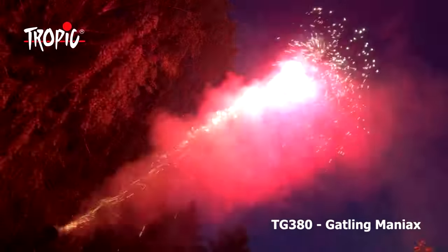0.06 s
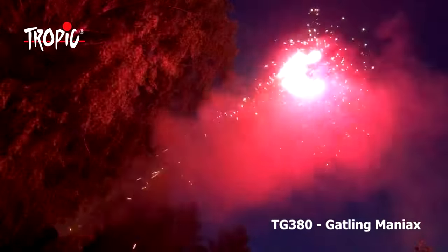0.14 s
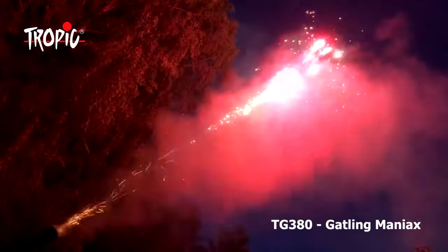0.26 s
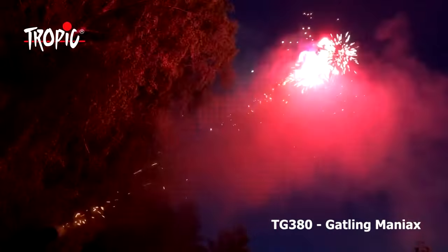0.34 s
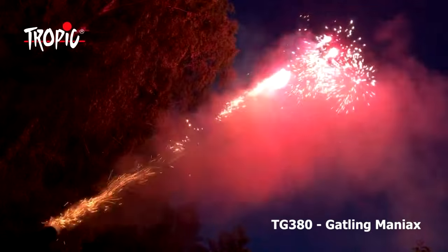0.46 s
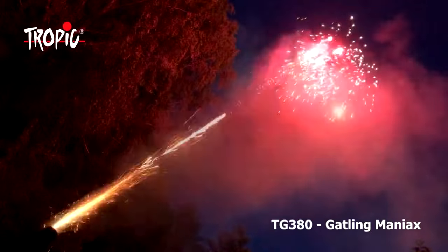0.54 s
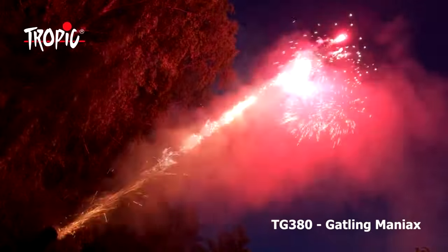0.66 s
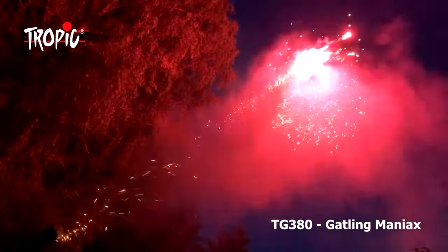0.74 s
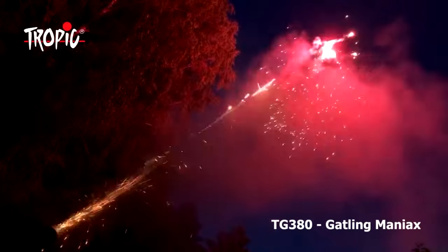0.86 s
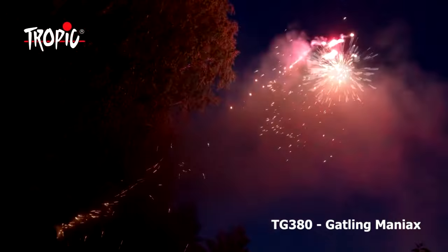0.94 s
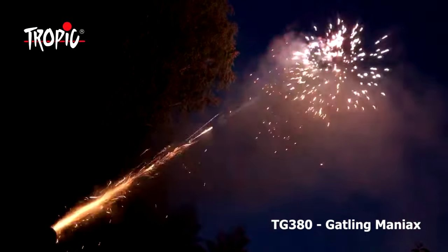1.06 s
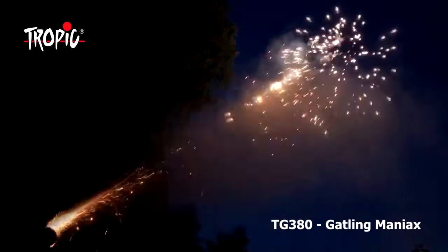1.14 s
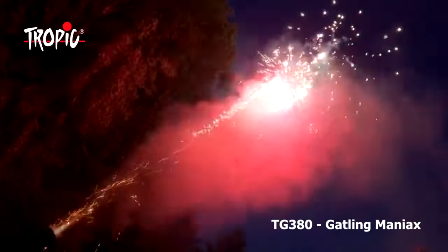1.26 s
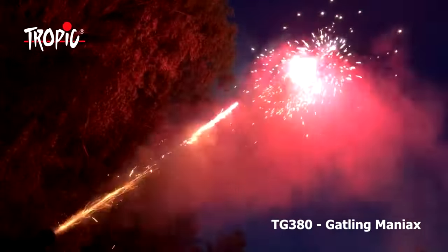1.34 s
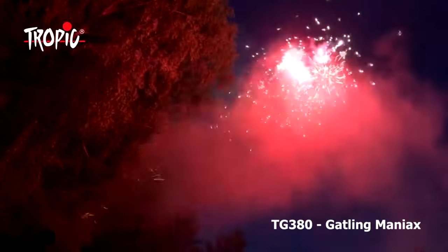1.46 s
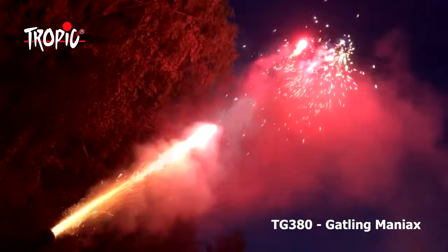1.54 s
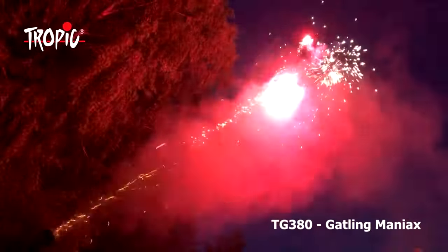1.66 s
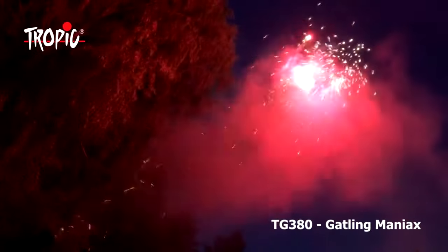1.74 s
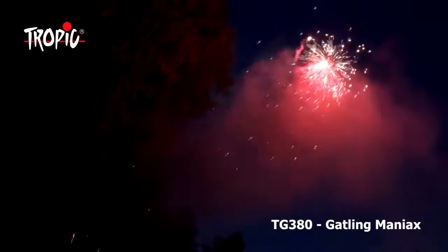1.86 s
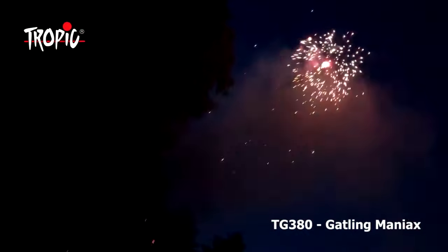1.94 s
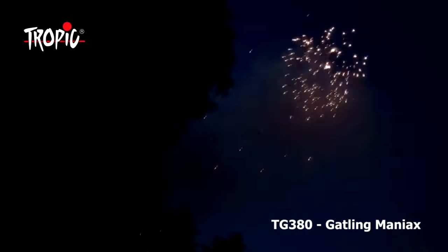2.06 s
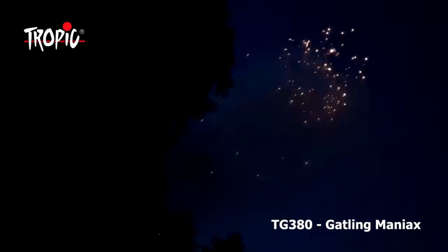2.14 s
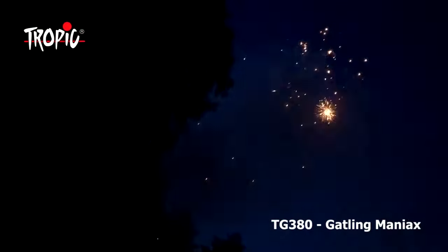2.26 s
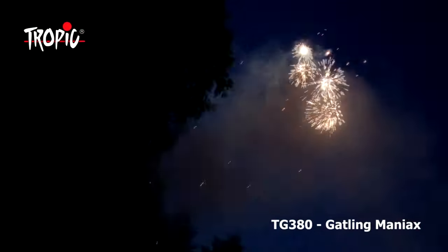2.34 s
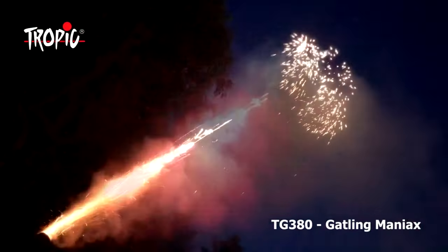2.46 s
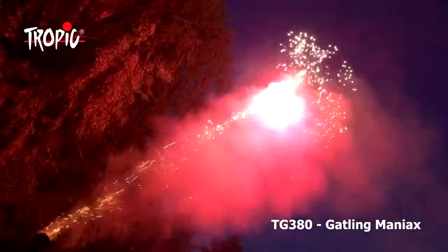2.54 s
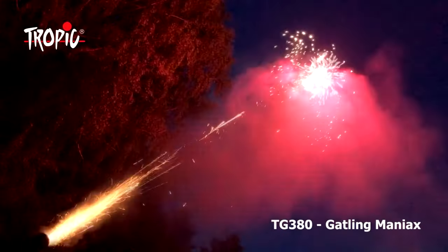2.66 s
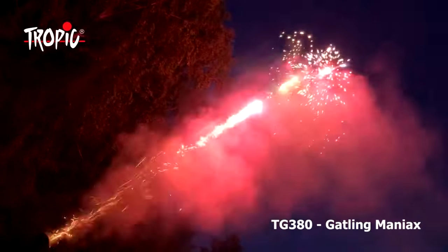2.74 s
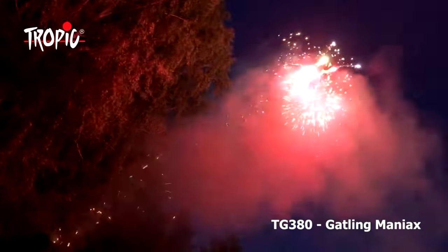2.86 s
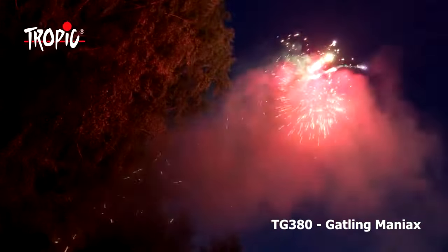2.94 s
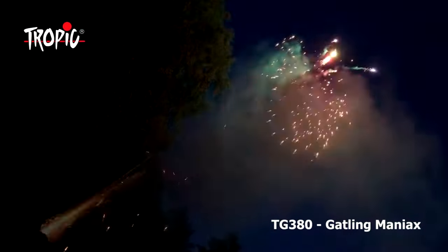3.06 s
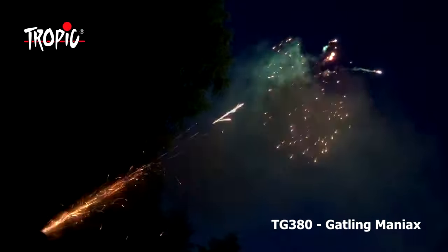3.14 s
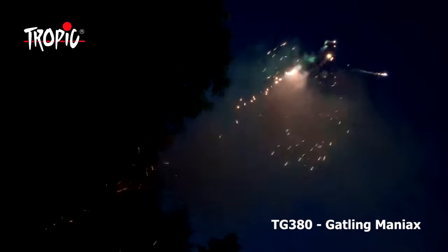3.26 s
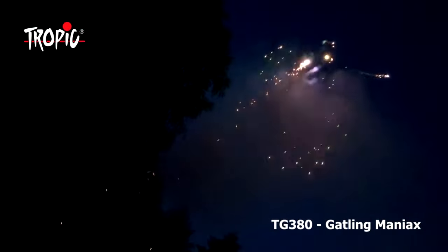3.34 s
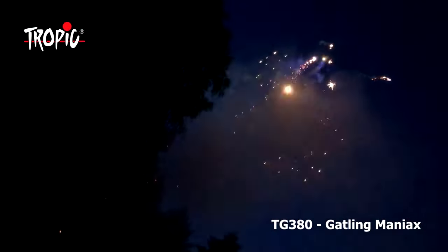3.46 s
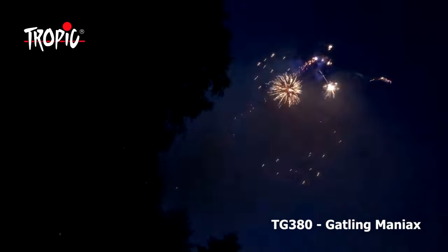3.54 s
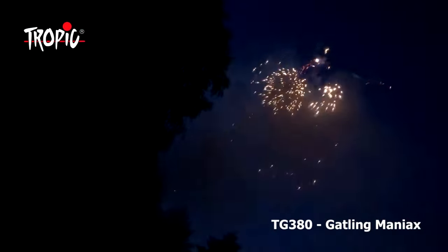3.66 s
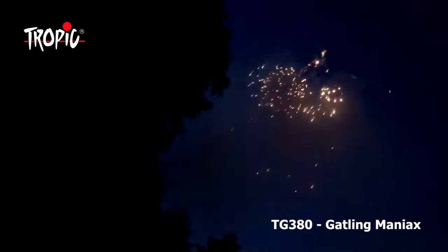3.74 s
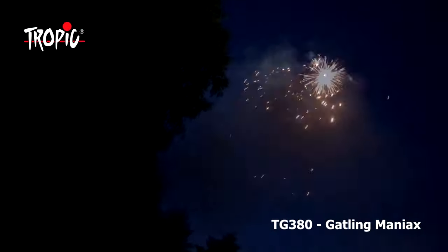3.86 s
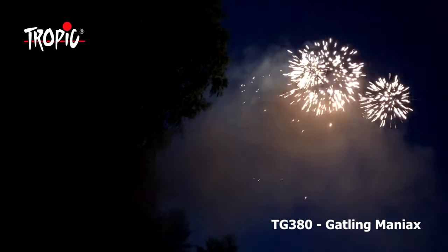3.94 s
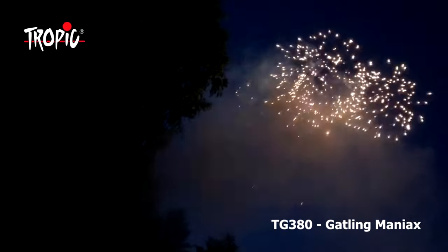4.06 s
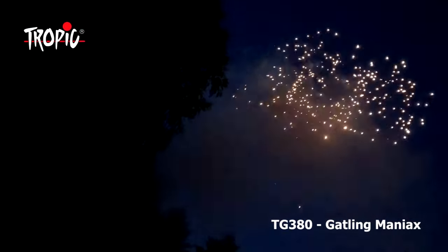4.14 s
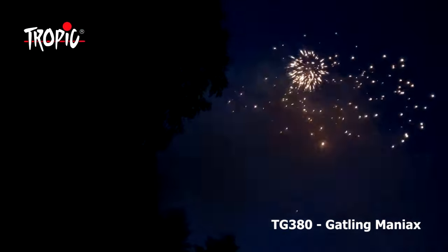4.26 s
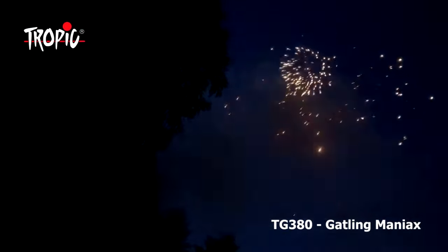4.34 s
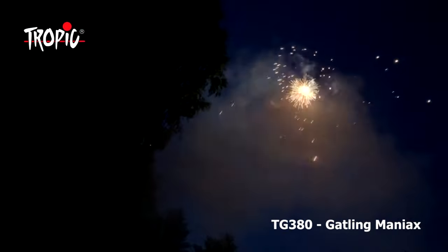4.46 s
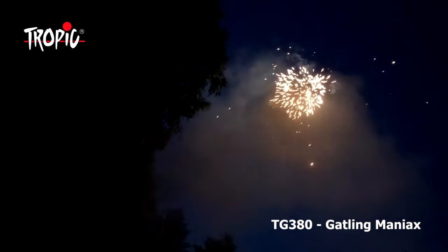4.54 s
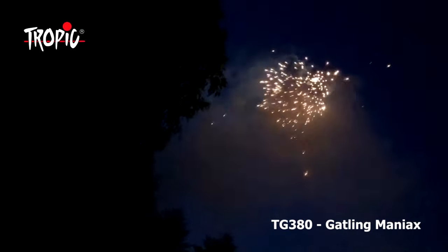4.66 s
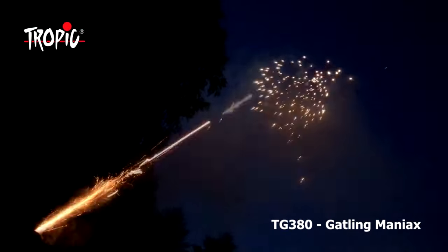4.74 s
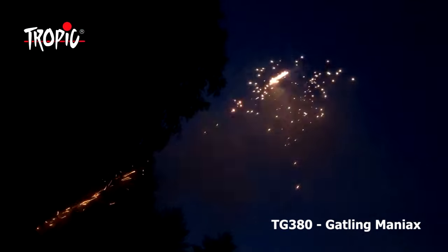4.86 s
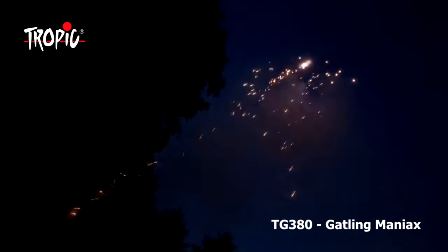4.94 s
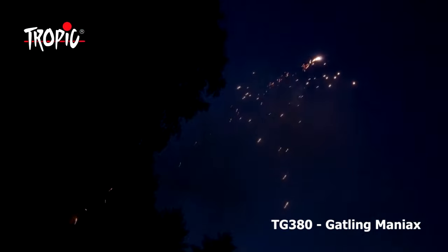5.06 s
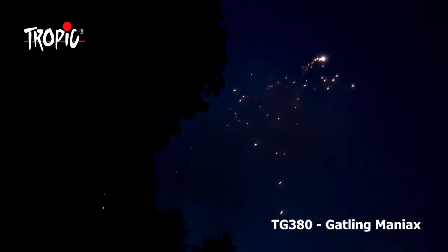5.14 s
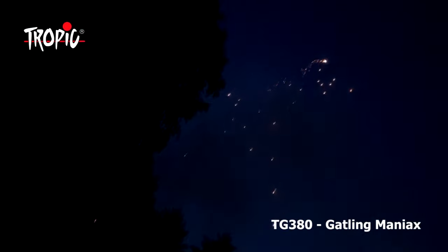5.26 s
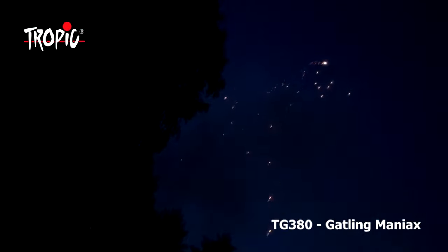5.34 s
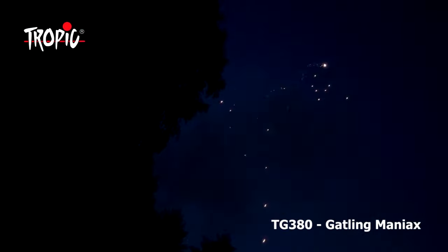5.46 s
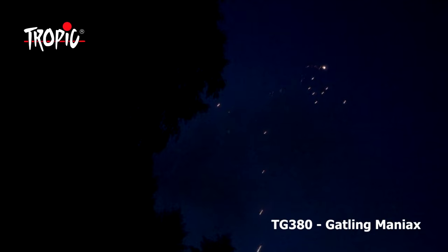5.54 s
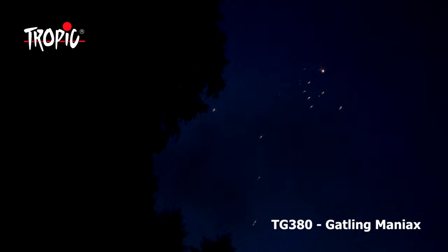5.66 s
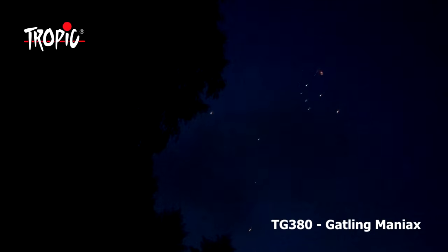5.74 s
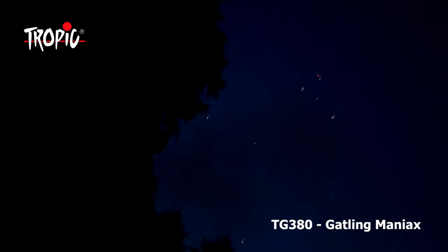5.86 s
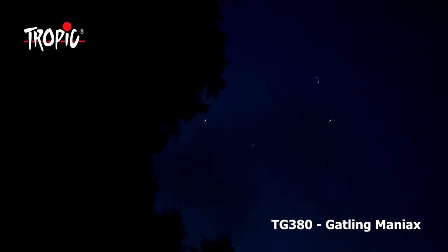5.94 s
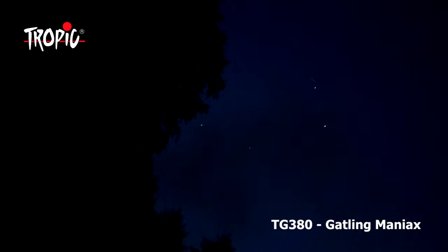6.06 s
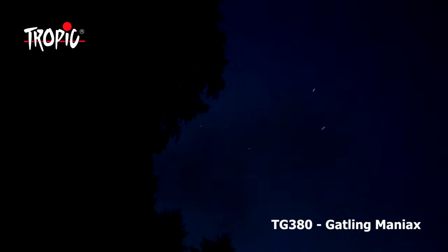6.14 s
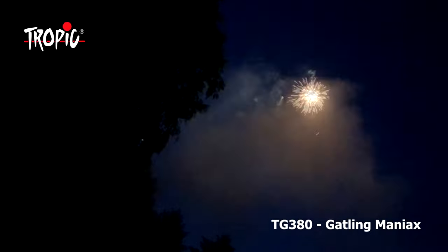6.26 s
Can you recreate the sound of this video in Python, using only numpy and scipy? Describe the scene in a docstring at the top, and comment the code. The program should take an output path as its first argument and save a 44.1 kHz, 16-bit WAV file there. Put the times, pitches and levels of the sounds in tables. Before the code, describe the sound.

A multi-shot firework fires outdoors among trees, over a faint distant rumble. From the start to about 1.8 seconds, launches come in quick, uneven succession, each a low thud with a muzzle crack and a bright hiss of sparks, mixed with loud, sharp pops of shells bursting overhead. The cracks end in a slight falling chirp and scatter into short echoes, while the thuds return as a dull, far roll. After a brief gap, another cluster of launches and bursts runs from 2.2 to 3 seconds. Lighter pops follow around 3.5 seconds, then two loud cracks near 3.9 and smaller single ones at about 4.2 and 4.5. A last, softer launch thuds and fizzes at 4.6 seconds. The echoes die away into a lull with only the low rumble, until one final shell cracks at about 6.3 seconds.

```python
"""A multi-shot firework in a garden at night. Over a distant rumble, an earlier shot is dying away.
Mortar tubes fire in quick succession: a thud, a rush of gas and hissing sparks, a muzzle crack.
Shells crack overhead, the trees scatter every report back, and the thuds return as a dull, far roll.
The recorder delays the bass, so cracks end in a falling chirp, and its limiter ducks at the loud ones.
After a lull, one last shell bursts."""
import sys
import numpy as np
from scipy import signal
from scipy.fft import rfft, irfft
from scipy.io import wavfile
from scipy.ndimage import uniform_filter1d, minimum_filter1d

SR = 44100
rng = np.random.default_rng(int(sys.argv[2]) if len(sys.argv) > 2 else 0)


def transcribe(u):
    """Save the signal u as a 16-bit wav file named by the first command-line argument.

    u: samples, shape (n,) or (channels, n), limited to [-1, 1]; the rate is SR.
    q: integer samples, one column per channel.
    """
    v = np.clip(np.atleast_2d(u).T, -1, 1)
    q = np.round(v * 32767).astype(np.int16)
    wavfile.write(sys.argv[1], SR, q)


N = 278270
T = np.arange(int(1.5 * SR)) / SR  # seconds into one event and its tail


def undb(db):
    """Decibels to gain."""
    return 10 ** (np.asarray(db) / 20)


def lookup(points, hz):
    """Read (freq_hz, value) points on a log-frequency axis."""
    freqs, values = np.transpose(points)
    return np.interp(np.log(np.maximum(hz, 1)), np.log(freqs), values)


def eq_curve(spectrum, size):
    """Gain per FFT bin from (freq_hz, level_db) points."""
    return undb(lookup(spectrum, np.fft.rfftfreq(size, 1 / SR)))


def fade(t60):
    """Exponential decay by 60 dB in t60 seconds."""
    return np.exp(-np.log(1000) * T / t60)


def noise(spectrum, size=len(T)):
    """Coloured noise of rms 1."""
    coloured = irfft(rfft(rng.standard_normal(size)) * eq_curve(spectrum, size), size)
    return coloured / np.std(coloured)


def response(spectrum, size=1024):
    """Minimum-phase impulse with the given spectrum."""
    cepstrum = irfft(np.log(eq_curve(spectrum, size)))
    cepstrum[1:size // 2] *= 2
    cepstrum[size // 2 + 1:] = 0
    return irfft(np.exp(rfft(cepstrum)))


def add(track, start_s, sound):
    """Mix a sound into the track, trimming any overhang."""
    start = int(round(start_s * SR))
    sound, start = sound[max(-start, 0):], max(start, 0)
    track[start:start + len(sound)] += sound[:max(N - start, 0)]


# Tone of the night bed: freq_hz, level_db
NIGHT_EQ = [(15, -38.5), (25, -20), (53, -3.5), (137, -4.5), (161, -8.5), (212, -2.5), (430, -12),
            (520, -12.5), (1740, -15.5), (3200, -23.5), (16000, -38)]

def night(level_db=-62, swell_db=1):
    """A bed of distant rumble that swells slowly."""
    swell = np.interp(np.arange(N), np.linspace(0, N, 32), rng.standard_normal(32))
    return noise(NIGHT_EQ, N) * undb(level_db + swell_db * swell)


def whistling(hiss, spacing_hz=75, streak_db=7.5, top_hz=9500):
    """A burning star sings faintly at many pitches of its own, less so in the high treble."""
    hz = np.fft.rfftfreq(len(hiss), 1 / SR)
    streaks = np.interp(hz / spacing_hz, np.arange(600), rng.standard_normal(600))
    singing = irfft(rfft(hiss) * undb(streak_db * streaks / (1 + (hz / top_hz) ** 2)), len(hiss))
    return singing / np.std(singing)


def tube(sound, pitch_hz=2147, bounce=0.055):
    """Sound runs up and down the short tube, which favours the multiples of its lowest tone."""
    round_trip = np.exp(-2j * np.pi * np.fft.rfftfreq(len(sound), 1 / SR) / pitch_hz)
    return irfft(rfft(sound) / (1 - bounce * round_trip), len(sound))


# Bright hiss of burning powder: freq_hz, level_db
SPARK_EQ = [(100, -6), (500, -12.5), (1500, -18), (2800, -10.5), (4500, -6), (6800, -2), (9000, -4),
            (15500, -7.5)]

def sparks(flare_t60=0.21, linger_db=-12, linger_t60=0.54, burn_db=-27, burn_t60=1.4, grain_db=2.0):
    """A jet of sparks flares from the tube, fizzes as the star climbs, and crackles as it burns out."""
    flare = fade(flare_t60) + undb(linger_db) * fade(linger_t60)
    jet = flare * tube(whistling(noise(SPARK_EQ)))
    grains = np.repeat(rng.exponential(size=len(T) // 50 + 1), 50)[:len(T)]
    burn = fade(burn_t60) * (1 - T / T[-1]) * undb(grain_db * grains) * noise(SPARK_EQ)
    return jet + undb(burn_db) * burn


# Tone of the scatter off the trees: freq_hz, level_db
FOLIAGE_EQ = [(40, -24), (170, -1), (450, -3), (800, -2), (1700, 2.5), (2900, -0.5), (4500, 2), (6500, -2),
              (9500, -7.5), (15500, -11)]

def foliage(centres_hz):
    """Countless small reflections blur into noise, split into one band per centre."""
    hz = np.fft.rfftfreq(N, 1 / SR)
    spectrum = rfft(rng.standard_normal(N)) * eq_curve(FOLIAGE_EQ, N)
    crossovers = [lookup(np.c_[centres_hz, solo], hz) for solo in np.eye(len(centres_hz))]
    bands = np.array([irfft(spectrum * crossover, N) for crossover in crossovers])
    return bands / np.std(bands.sum(0))


def blast(pitch_hz):
    """Blast wave: a pressure jump, then a weaker suction; bigger charges are slower."""
    resonance = signal.iirpeak(pitch_hz, Q=.5, fs=SR)
    wave = signal.lfilter(*resonance, signal.unit_impulse(4096))
    return wave / wave.max()


def slap(pitch_hz):
    """A blast wave softened by its bounce off a wall or trunk, peak 1."""
    wave = signal.sosfilt(signal.butter(2, 2 * pitch_hz, fs=SR, output="sos"), blast(pitch_hz))
    return wave / wave.max()


# Decay of the near foliage's echo: freq_hz, t60_s
FOLIAGE_DECAY = [(60, 0.91), (220, 0.57), (600, 0.57), (1800, 0.84), (4500, 0.71), (8000, 0.51),
                 (15000, 0.16)]

def echoes(reports, rise_s=0.0036, far_db=-25, far_t60=1.1, air_hz=2400,
           wall_s=0.14, wall_db=-1, trunk_db=5, trunk_t60=0.49, trunks=14):
    """Near foliage scatters each report, far trees add a long dull tail, trunks and a house wall slap."""
    octaves_hz = 31.25 * 2. ** np.arange(10)
    bands = foliage(octaves_hz)
    near = np.array([fade(lookup(FOLIAGE_DECAY, hz)) for hz in octaves_hz])
    far = np.array([undb(far_db) * fade(far_t60) / (1 + (hz / air_hz) ** 2) for hz in octaves_hz])
    attack, release = 1 - np.exp(-T / rise_s), np.minimum(1, 2 * (T[-1] - T))
    envelopes = (near + far) * attack * release
    wall, trunk = slap(pitch_hz=800), slap(pitch_hz=1300)
    out = np.zeros(N)
    for start_s, level_db in reports:
        # every report comes from another place and meets other clumps of leaves
        place = rng.integers(N - len(T))
        clumps_db = np.interp(T, np.linspace(0, T[-1], 150), rng.standard_normal(150))
        scatter = (envelopes * bands[:, place:place + len(T)]).sum(0)
        add(out, start_s, undb(level_db + clumps_db) * scatter)
        add(out, start_s + wall_s * rng.uniform(1.0, 1.05), undb(level_db + wall_db) * wall)
        for lag_s in rng.uniform(.012, 0.27, trunks):
            add(out, start_s + lag_s, undb(level_db + trunk_db - 60 * lag_s / trunk_t60) * trunk)
    return out


# Tone of the low noise before a shot: freq_hz, level_db
LEAD_IN_EQ = [(60, -24), (300, -1), (900, -12), (1800, -10), (3500, -24), (15000, -34)]

def lead_in(length_s):
    """A brief, dull, low noise just before each shot."""
    return (T < length_s) * noise(LEAD_IN_EQ)


# Body of the lift charge: freq_hz, level_db
THUD_EQ = [(20, -25), (40, -5), (65, 8.5), (110, 1), (170, 7), (300, 0), (600, -14), (2000, -39.5),
           (8000, -87)]

def thud(knock_hz=220, knock_db=3.5, width=0.23):
    """The lift charge's low pulse, peak near 1; every tube adds the same hollow knock."""
    hollow = [(hz, db + knock_db * np.exp(-(np.log(hz / knock_hz) / width) ** 2 / 2))
              for hz, db in THUD_EQ]
    return response(hollow, size=8192) / response(THUD_EQ, size=8192).max()


# Tone of the rushing gas: freq_hz, level_db
GAS_EQ = [(40, -8.5), (200, 7), (450, -10.5), (950, -17), (1800, -3.5), (2600, -5.5), (3400, -17.5),
          (4500, -11.5), (8000, -14.5), (15500, -18)]

def gas_rush(length_s, ramp_s=.001):
    """Gas rushes past the shell: a tightly gated noise, coloured by the tube."""
    gate = np.clip(np.minimum(T, length_s + ramp_s - T) / ramp_s, 0, 1)
    return gate * tube(noise(GAS_EQ))


# Colour of muzzle and shell cracks: freq_hz, level_db
CRACK_EQ = [(100, 7.5), (260, 6), (450, 3.5), (900, 0), (1200, -1.5), (1450, 1), (1750, 2), (2100, -1),
            (2500, -7), (2850, -7), (3300, -2), (4200, 1.5), (5200, -0.5), (6000, -3), (7000, 0.5),
            (15000, -14)]

def crack(pitch_hz, rounding=8.7, ground_lag_s=.00123, ground_db=-14):
    """A blast wave and its ground bounce, peak 1; the air rounds the front of slow waves most."""
    air = signal.butter(1, min(rounding * pitch_hz, SR / 2.5), fs=SR)
    direct = signal.fftconvolve(signal.lfilter(*air, blast(pitch_hz)), response(CRACK_EQ))
    samples = np.arange(len(direct))
    bounce = np.interp(samples - ground_lag_s * SR, samples, direct, left=0)
    wave = direct + undb(ground_db) * bounce
    return wave / np.abs(wave).max()


def ragged(wave, spread_t60=0.0067, share=.4):
    """Turbulent gas breaks a blast into a leading front and a brief jumble of later ones."""
    fronts = rng.standard_normal(1024) * fade(spread_t60)[:1024]
    fronts *= share / np.linalg.norm(fronts)
    fronts[0] += 1
    return signal.fftconvolve(wave, fronts)


# Mortar cues, with levels that each layer offsets: crack_s, rush_s, gas_db, thud_db
MORTAR_CUES = [(0.0934, 0.0072, -9, -22), (0.2791, 0.0079, -4.5, -16.5), (0.4253, .009, -13, -28),
               (0.5108, .008, -7, -30), (.713, .0075, -13.5, -28), (.9304, 0.0094, -15, -30),
               (1.0676, 0.0067, -10.5, -28.5), (1.207, 0.0094, -12.5, -37.5), (1.4203, 0.012, -21.5, -30),
               (1.4429, 0.0045, -9.5, -26.5), (2.312, .0105, -12, -25), (2.3352, 0.012, -6, -22),
               (2.5482, .0075, -12, -25.5), (2.588, 0.012, -11.5, -31.5), (2.996, 0.0097, -15, -30.5),
               (4.6252, 0.0092, -16, -32.5)]

def mortars(lead_in_s=0.0076, lead_in_db=-16, thud_gain_db=17, rush_db=1, sparks_db=-10.5,
            muzzle_hz=850, muzzle_db=19):
    """After a dull lead-in, the lift charge thuds, gas and sparks rush out, and the muzzle cracks."""
    out = np.zeros(N)
    for crack_s, rush_s, gas_db, thud_db in MORTAR_CUES:
        ignition_s = crack_s - rush_s
        add(out, ignition_s - lead_in_s, undb(gas_db + lead_in_db) * lead_in(lead_in_s))
        add(out, ignition_s, undb(thud_db + thud_gain_db) * thud())
        add(out, ignition_s, undb(gas_db + rush_db) * gas_rush(rush_s))
        add(out, crack_s, undb(gas_db + muzzle_db) * ragged(crack(muzzle_hz)))
        add(out, ignition_s, undb(gas_db + sparks_db) * sparks())
    return out


# Dark tone of the returning thuds: freq_hz, level_db
ROLL_EQ = [(40, -12), (80, -5), (125, 1.5), (180, 3), (280, -0.5), (500, -19), (1500, -12.5), (3000, -27),
           (10000, -51.5)]

def distant_roll(rumble_db=-20, rumble_t60=2.0, delay_s=.61, swell_s=0.072, roll_db=-28):
    """Each thud rumbles around the garden and comes back from far away as a soft, dull swell."""
    out = np.zeros(N)
    swell = T / swell_s * np.exp(1 - T / swell_s)
    for crack_s, _, _, thud_db in MORTAR_CUES:
        add(out, crack_s, undb(thud_db + rumble_db) * fade(rumble_t60) * noise(ROLL_EQ))
        add(out, crack_s + delay_s, undb(thud_db + roll_db) * swell * noise(ROLL_EQ))
    return out


# Shell bursts overhead, at relative levels: start_s, level_db, pitch_hz
SHELL_CUES = [(0.2675, 0.5, 3300), (0.3003, -0.5, 5670), (0.3225, 8, 3327), (0.3549, 2.5, 5440),
              (0.3648, 6.5, 1614), (.5616, 5, 1700), (0.5853, 11, 2590), (.8995, 13, 2324),
              (1.1652, 6, 1427), (1.2575, 9.5, 1700), (1.4204, -1, 950), (1.431, 11, 2006),
              (1.481, 7.5, 2420), (1.5719, 8.5, 3003), (1.6047, 11, 3445), (1.8164, 9.5, 2263),
              (2.192, -31, 2600), (2.2566, 1.5, 2978), (2.2652, 0, 1194), (2.287, 6.5, 3200),
              (2.6412, 10.5, 2390), (2.7711, 10.5, 1950), (3.223, -24.5, 4020), (3.4365, -15, 1100),
              (3.4443, -15, 3510), (3.478, -4, 2590), (3.506, -1, 3510), (3.5322, 1, 1078),
              (3.8504, 13.5, 2380), (3.906, 9, 2260), (3.9163, -4, 1050), (4.0286, -13, 2920),
              (4.2217, 1, 1410), (4.4523, 1, 1206), (6.251, 5, 1820)]

def shells(crack_db=2, sputter_db=-20, sputter_t60=0.0051):
    """Each shell bursts with one sharp crack and a brief sputter of burning powder."""
    out = np.zeros(N)
    for start_s, level_db, pitch_hz in SHELL_CUES:
        add(out, start_s, undb(level_db + crack_db) * crack(pitch_hz))
        powder = signal.fftconvolve(noise(SPARK_EQ, 2048), blast(pitch_hz))[:2048]
        sputter = fade(sputter_t60)[:2048] * powder / np.std(powder)
        add(out, start_s, undb(level_db + sputter_db) * sputter)
    return out


def scene(shell_send_db=-35.5, send_db_per_octave=-6.5, pivot_hz=2140, mortar_send_db=-22):
    """Shots, bursts and their echoes over the night bed, in mono."""
    reports = [(-0.035, -29)]  # an earlier shot's echo: start_s, level_db
    # slower blast waves carry more energy into the trees
    reports += [(start_s, level_db + shell_send_db + send_db_per_octave * np.log2(pitch_hz / pivot_hz))
                for start_s, level_db, pitch_hz in SHELL_CUES]
    reports += [(crack_s, gas_db + mortar_send_db) for crack_s, _, gas_db, _ in MORTAR_CUES]
    mix = shells() + mortars() + echoes(reports) + distant_roll() + night()
    add(mix, -.08, undb(-23) * sparks())  # the earlier shot is still fizzing
    return mix[None]


def bass_lag(sound, stages_hz=(62, 115, 290, 560, 1000, 1900, 5000), damping=0.99):
    """All-pass stages about an octave apart: the lower the tone, the later it comes."""
    for hz in stages_hz:
        angle = 2 * np.pi * hz / SR
        feedback = [1 + damping * np.sin(angle), -2 * np.cos(angle), 1 - damping * np.sin(angle)]
        sound = signal.lfilter(feedback[::-1], feedback, sound)
    return sound


def limiter(sound, ceiling=.66, hold_s=.009, ramp_s=.001):
    """Look-ahead limiter: the gain ramps down before a peak, is held, and springs back."""
    hold, ramp = int(hold_s * SR), int(ramp_s * SR)
    gain = ceiling / np.maximum(np.abs(sound), ceiling)
    held = minimum_filter1d(gain, hold + ramp, origin=hold // 2)
    return sound * uniform_filter1d(held, ramp)


def record(dry, low_cut_hz=34, high_cut_hz=15900):
    """The recorder's chain: bass lag, limiter, low cut and a steep high cut."""
    limited = limiter(bass_lag(dry[0]))
    trimmed = signal.sosfilt(signal.butter(2, low_cut_hz, "high", fs=SR, output="sos"), limited)
    return signal.sosfilt(signal.ellip(8, .2, 70, high_cut_hz, fs=SR, output="sos"), trimmed)[None]


dry = scene()
out = record(dry)
transcribe(out)
```